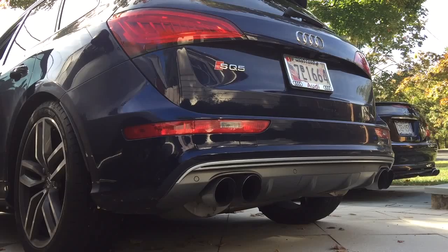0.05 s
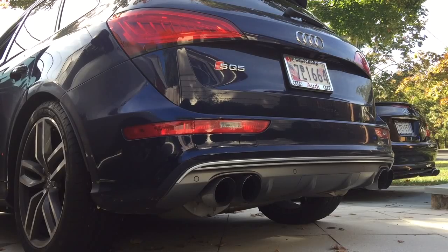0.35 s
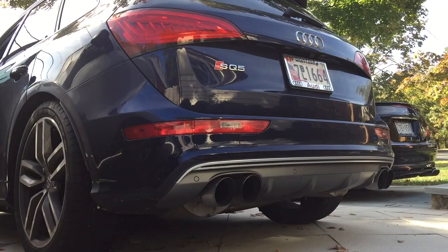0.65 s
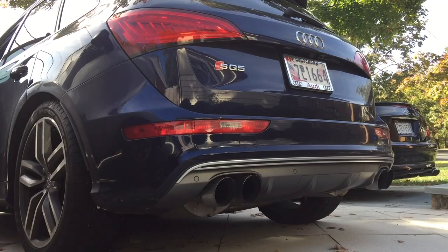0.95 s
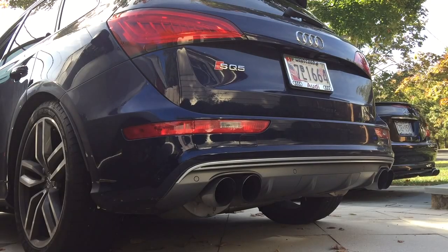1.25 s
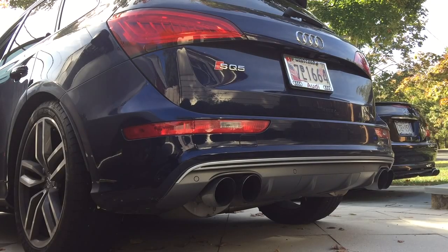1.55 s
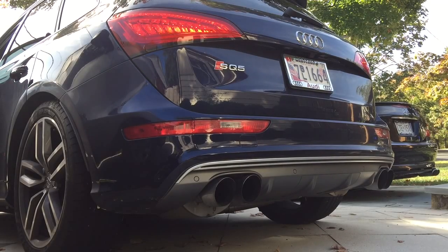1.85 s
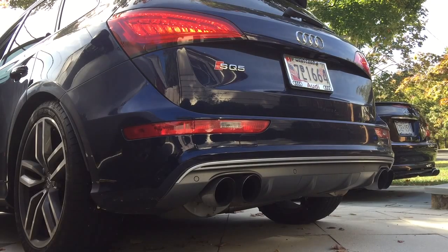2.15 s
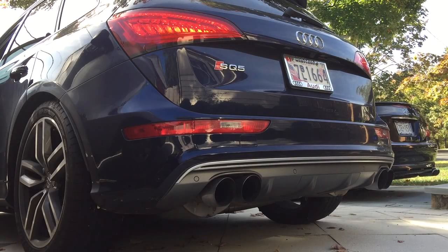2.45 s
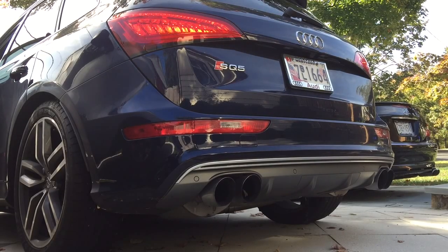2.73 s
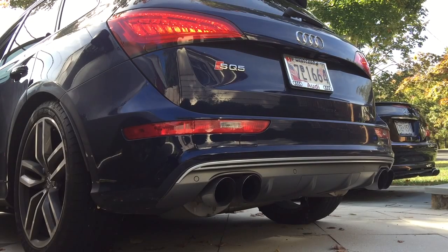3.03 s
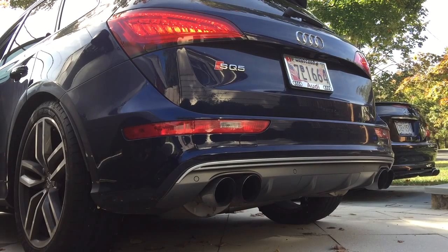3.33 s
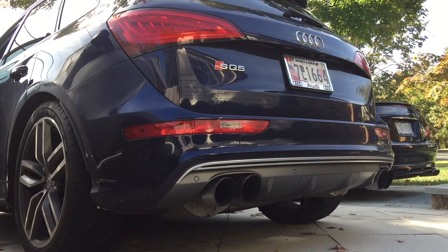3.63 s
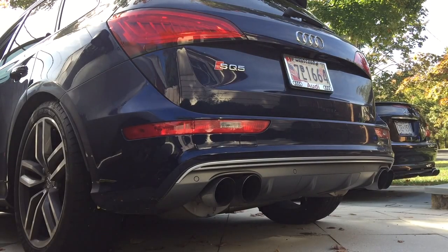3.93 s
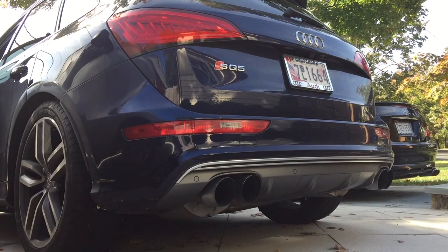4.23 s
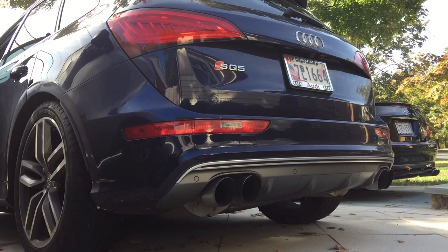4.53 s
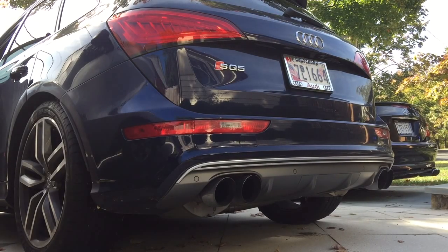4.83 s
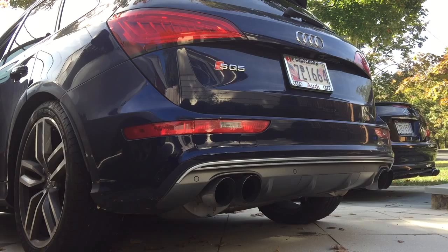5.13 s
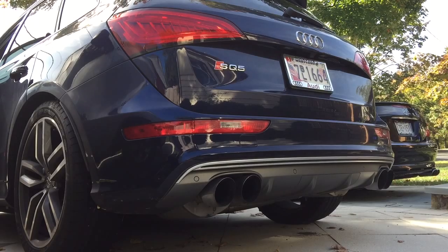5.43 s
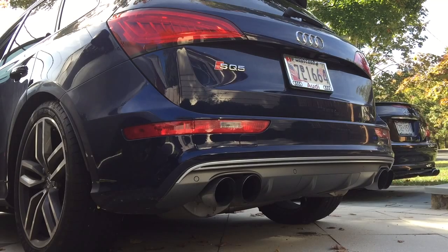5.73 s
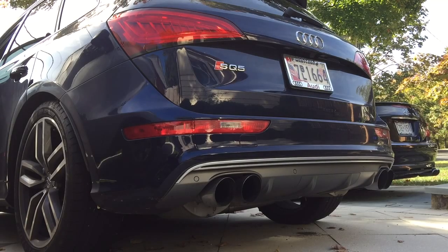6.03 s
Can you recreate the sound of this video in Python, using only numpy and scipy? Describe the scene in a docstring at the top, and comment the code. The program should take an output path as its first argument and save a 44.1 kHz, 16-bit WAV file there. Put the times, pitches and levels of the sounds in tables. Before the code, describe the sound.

A car starter clacks and cranks, then the engine catches, flares and settles into a loud, booming idle outdoors.

```python
"""Distant traffic, a soft whirr and a faint insect on a paved drive; the microphone is just behind the
tailpipes of a cold V6 car. The starter clacks in and grinds through eight compressions. The engine
catches with a few chuffs, flares, and settles to a loud, booming fast idle: each firing rings the
exhaust pipe, the lowest orders boom in its deep resonances, and the escaping gas rasps and fizzes.
Short echoes scatter between the paving and the floor of the car."""
import sys
import numpy as np
from scipy import signal
from scipy.fft import rfft, irfft
from scipy.io import wavfile
from scipy.ndimage import uniform_filter1d

SR = 44100
rng = np.random.default_rng(int(sys.argv[2]) if len(sys.argv) > 2 else 0)


def transcribe(u):
    """Save the signal u as a 16-bit wav file named by the first command-line argument.

    u: samples, shape (n,) or (channels, n), limited to [-1, 1]; the rate is SR.
    q: integer samples, one column per channel.
    """
    v = np.clip(np.atleast_2d(u).T, -1, 1)
    q = np.round(v * 32767).astype(np.int16)
    wavfile.write(sys.argv[1], SR, q)


N = 276948
T = np.arange(N) / SR
HZ = np.fft.rfftfreq(N, 1 / SR)


def exhaust(catch_s=2.72):
    """The running engine at the tailpipes: bark, drone and rushing gas follow its speed and load."""
    # engine speed: time_s, firing_rate_hz
    speed = [(2.72, 15.12), (2.8, 42.38), (2.97, 70.94), (3.2, 93.71), (3.3, 95.54), (3.4, 92.8),
             (3.6, 83.54), (3.7, 75.76), (3.95, 71.33), (4.2, 70.11), (4.55, 69.81), (4.78, 70.36),
             (4.95, 68.26), (5.28, 65.08), (5.55, 64.34), (5.98, 64.59), (6.28, 62.51)]
    firing_hz = curves(speed)[0] * (T >= catch_s)
    fired = np.cumsum(firing_hz) / SR  # running count of firings
    pulses, fronts = firings(fired)
    ragged = swell(2.815, .06)  # the first charges burn raggedly
    layers = bark(pulses, fronts, ragged) + drone(firing_hz, fired) + rush(pulses, ragged)
    return ramp(catch_s, .025) * layers


def firings(fired, idle_drop_s=4.9, jitter=.005):
    """Pulse bodies and fronts, one blow-down per firing: uneven while cold, loping as the idle drops."""
    # cylinders in firing order, before and after the drop: body_db, front_db, late_intervals
    fast_idle = [(-1.1, 1.2, .34), (-1.9, .4, .317), (2.2, -7.5, .338), (2.8, -5.5, .327),
                 (-2.3, -7.5, .33), (-2.8, -9, .361)]
    slow_idle = [(-1, 1.2, .276), (-.4, 2.7, .257), (4.6, -6, .287), (.8, -1.3, .275), (-3.1, -11, .324),
                 (-5.4, -12, .293)]
    # extra hard firings in the flare: time_s, boost_db
    bangs = [(2.9, 10), (2.948, 13), (3.092, 7.5), (3.104, 3.5), (3.425, 11.5), (3.539, 4.5), (3.575, 6),
             (3.742, 3)]
    k = np.arange(int(fired[-1]))
    cylinder = k % len(fast_idle)
    dropped = np.interp(k, fired, ramp(idle_drop_s, .12))[:, None]
    blend = (1 - dropped) * np.array(fast_idle)[cylinder] + dropped * np.array(slow_idle)[cylinder]
    body_db, front_db, late = blend.T
    timing, strength = rng.standard_normal((len(k), 2)).T
    fire_s = np.interp(k + late + jitter * timing, fired, T)
    extra_db = strength * np.interp(fire_s, [3.0, 3.8], [1.6, .6])  # less scatter as it warms
    for s, db in bangs:
        extra_db[np.argmin(abs(fire_s - s))] += db
    return [np.bincount((fire_s * SR).astype(int), amp(db + extra_db), N)[:N] for db in (body_db, front_db)]


def bark(pulses, fronts, ragged, crossover_hz=560):
    """Pulses and turbulence ring the pipe; steep fronts feed its upper resonances and crack under load."""
    upper = 1 / (1 + (crossover_hz / (HZ + 1)) ** 8)
    edge = amp(2.5 + 3 * ramp(2.9, .083))
    drive = irfft(rfft(pulses) * (1 - upper) + rfft(fronts * edge) * upper, N)
    turbulence = (.09 + .35 * ragged) * puffs(pulses, decay_s=.018, stream=.98) * noise()
    crack = steady(band(puffs(fronts, decay_s=.00066, stream=0) * noise(), 1300, 1650))
    ring = steady(pipe(steady(drive) + turbulence))
    return load_gain(-17, slope=.98) * ring + load_gain(-66, slope=2.4) * crack


def pipe(x, round_trip_s=.0054, direct=.91, size=8192):
    """The exhaust system rings at its resonances; the silencer swallows what lies above them."""
    # pipe and silencer resonances: pitch_hz, width_hz, gain_db
    modes = [(206.5, 14.3, -4), (275.4, 45.5, 4.5), (344.5, 8, -1), (378.9, 29.5, 5.5), (443.4, 28.4, -5.5),
             (498.4, 35.6, -9), (530, 53, -6), (628.7, 70, -8.5), (721.5, 32, -15.5), (814, 17, -24),
             (890, 59, -19.5), (985, 83, -33)]
    hz = np.fft.fftfreq(size, 1 / SR)
    gain = response(modes, abs(hz)) / (1 + (hz / 1100) ** 8) / (1 + (150 / (abs(hz) + 1)) ** 6) + 1e-5
    causal = np.exp(signal.hilbert(np.log(gain)).conj())  # minimum phase
    echo = np.exp(-2j * np.pi * hz * round_trip_s)
    bounces = (direct + echo) / (1 + direct * echo)  # these fill the gaps between firings
    ring = np.fft.ifft(causal * bounces).real
    return signal.oaconvolve(x, ring[:size // 2])[:N]


def drone(firing_hz, fired, waver=.028):
    """The three lowest multiples of the firing rate boom as they sweep through deep resonances."""
    # resonances of the whole exhaust: pitch_hz, width_hz, gain_db
    deep_modes = [(54, 5.8, -11), (82.9, 10.8, -17), (143.9, 21, -14)]
    waves = 0
    for k in (1, 2, 3):
        wave = np.cos(2 * np.pi * k * (fired - .45))
        waves += response(deep_modes, k * firing_hz) * wave * (1 + waver * drift(25))
    return np.sqrt(2) * load_gain(.1, slope=.64) * waves


def rush(pulses, ragged):
    """Gas leaves the tailpipes as low gusts, rasp and fizz, lifted by the catch and the open throttle."""
    # middle and top spectra of the gas jet: frequency_hz, level_db
    rasp_spectrum = [(680, -11), (1150, -3), (1250, 1), (1370, -4), (1500, -2), (1920, -6), (2070, -3),
                     (2390, -4.5), (3320, -10), (3590, -14), (4100, -5), (4830, -15), (5070, -23.5),
                     (5570, -13.5), (7500, -44.5), (9750, -58), (16500, -120)]
    fizz_spectrum = [(3820, -19), (6500, 0), (7450, -3), (9710, -2), (10500, -8), (13300, -4.5),
                     (17000, -12)]
    throttle = ramp(2.76, .04) * (1 - ramp(3.14, .05))
    gust = unit(band(noise(), 36, 174, order=4)) * (amp(-44) + amp(-22) * swell(2.8, .06))
    jet = noise() * amp(1.2 * drift(400))
    jet = jet + amp(-10) * ringing(jet, t60=.015)
    rasp = steady(colour(jet, rasp_spectrum) * puffs(pulses, decay_s=.0068, stream=1))
    spray = colour(jet * amp(1.1 * drift(900)), fizz_spectrum)
    fizz = steady(spray * puffs(pulses, decay_s=.0025, stream=2.7))
    rasp *= amp(3.85 * throttle + 6.6 * ragged + .6 * drift(12))
    fizz *= amp(9 * throttle + 9 * ragged + 7 * ramp(2.9, 2.4))  # more hiss as the pipes warm up
    return gust + load_gain(-44.5, slope=.4) * rasp + load_gain(-61, slope=.3) * fizz


def puffs(pulses, decay_s, stream):
    """Gas flow: a dying jet after each pulse, over a steady stream."""
    return steady(signal.lfilter([1], [1, -np.exp(-1 / (decay_s * SR))], pulses)) + stream


def load_gain(idle_db, slope):
    """Gain of an exhaust layer, rising by slope dB for each dB of engine load."""
    # how hard the engine works against idle: time_s, load_db
    load = [(2.74, -10), (2.83, -0.5), (2.9, 0), (2.96, 5), (3.02, 7.5), (3.06, -.5), (3.1, 5.5), (3.16, 8),
            (3.21, -0.5), (3.39, 0.8), (3.54, 6), (3.66, -5), (3.73, -6.5), (3.81, -1), (4.3, -2.5),
            (5.0, 1.3), (5.2, -2.5), (5.65, .3)]
    return amp(idle_db + slope * curves(load)[0])


def starter(puff_delay_s=.0045):
    """Gear rattle swells at every compression and rings the housing, along with a puff of pumped air."""
    # compressions: start_s, relative_gear_db, relative_puff_db
    strokes = [(2.005, -38, -32), (2.117, -36, -29.5), (2.218, -35.5, -34), (2.3, -35.5, -31),
               (2.385, -37.5, -33), (2.47, -36, -31), (2.56, -38.5, -32), (2.648, -36.5, -32.5)]
    # gear noise spectrum: frequency_hz, level_db
    gears = [(150, -16), (260, 4.5), (350, -3.5), (442, 2.5), (551, -6.5), (650, -3), (900, 0),
             (1160, -9.5), (1450, -7), (2520, -19.5), (4700, -22.5), (6590, -22), (13200, -39),
             (17000, -40)]
    # housing resonances against the gear noise: pitch_hz, width_hz, level_db
    housing = [(1680, 34, -38), (2130, 420, -10), (2520, 210, -9.5), (3240, 32, -19), (4140, 100, -32)]
    engaged = ramp(1.85, .0039) * (1 - ramp(2.74, .29))
    coast = amp(np.interp(T, [1.9, 2.08], [-42, -46]))
    strain = coast + amp(-5.5) * sum(amp(db) * compression(s) for s, db, _ in strokes)
    pump = sum(amp(db) * swell(s + puff_delay_s, .02) for s, _, db in strokes)
    grind = noise() * amp(1.4 * drift(500))
    grind = grind + amp(-5) * ringing(grind, t60=.08)
    ring = sum(amp(db) * unit(band(grind, hz - width / 2, hz + width / 2, order=1))
               for hz, width, db in housing)
    air = amp(-1.5) * steady(band(noise(), 39.7, 62, order=3), size=1500)
    air += amp(-5.5) * steady(band(noise(), 98, 155, order=4), size=1500)
    return engaged * (strain * (colour(grind, gears) + ring) + pump * air)


def compression(start_s, rise_s=.01, hold_s=.032, fall_s=.016):
    """The starter's strain against one compression: attack, hold, release."""
    return ramp(start_s, rise_s) * np.exp(-np.maximum(T - start_s - hold_s, 0) / fall_s)


def knocks(rise_s=.0049):
    """Solenoid, pinion, first chuffs and small ticks: noise bursts dying away around their own pitch."""
    # bursts: start_s, relative_level_db, decay_s, pitch_hz, width_octaves
    bursts = [(.408, -53, .012, 5000, 0.33), (0.486, -47, 0.013, 13000, 0.44),
              (.838, -54, .012, 14600, .06), (1.327, -56, 0.017, 3000, 0.37),
              (1.709, -50, 0.0062, 4500, 0.41), (1.828, -29, 0.046, 1710, 1.2),
              (1.856, -18.5, 0.012, 960, 1.1), (1.857, -25, 0.044, 303, 1.24),
              (1.895, -33.5, 0.011, 8000, 0.82), (2.788, -28, 0.0067, 6560, 0.15),
              (2.809, -25, 0.0076, 8650, 0.23), (2.832, -16, 0.0033, 7100, 0.67),
              (2.947, -14, 0.0068, 1030, 0.11), (2.947, -30.5, 0.017, 7950, 2),
              (5.485, -20, 0.0045, 2000, 0.96)]
    out, t = np.zeros(N), T[:SR // 4]
    hz = np.fft.rfftfreq(len(t), 1 / SR) + 1
    for start_s, db, decay_s, pitch_hz, octaves in bursts:
        spectrum = np.exp(-.5 * (np.log2(hz / pitch_hz) / octaves) ** 2)
        burst = unit(irfft(rfft(rng.standard_normal(len(t))) * spectrum, len(t)))
        envelope = (1 - np.exp(-t / rise_s)) * np.exp(-t / decay_s)
        part = out[int(start_s * SR):][:len(t)]
        part += (amp(db - 1) * burst * envelope)[:len(part)]
    return out


def underbody(x, wet_db=-15):
    """Adds scattered echoes between the paving and the floor of the car."""
    return x + amp(wet_db) * band(ringing(x, t60=.076), 200, 15000)


def ringing(x, t60):
    """Dense, quickly dying echoes of metal and hard surfaces."""
    t = T[:SR // 4]
    tail = rng.standard_normal(len(t)) * amp(-60 * t / t60) * (t > .004)
    return signal.oaconvolve(x, tail / np.linalg.norm(tail))[:N]


def traffic(level_db=-39.5):
    """Distant traffic: a low, wavering rumble."""
    # rumble spectrum: frequency_hz, level_db
    spectrum = [(15, -64), (25, -27), (48, -21), (59, -4), (82, 0), (153, -7.5), (185, -13.5), (405, -29.5),
                (531, -32.5), (734, -33), (1190, -34.5), (2760, -46), (5570, -53), (7310, -55.5),
                (16000, -60)]
    return amp(level_db) * colour(noise(), spectrum) * amp(1.3 * drift(22))


def whirr():
    """A soft whirr comes and goes before the start, with a brief low hum towards its end."""
    # loudness of the whirr: time_s, level_db
    levels = [(0, -48), (.2, -55.5), (.9, -61), (1.28, -90), (1.35, -57.5), (1.58, -49.5), (1.68, -71),
              (1.9, -123)]
    # its spectrum: frequency_hz, level_db
    spectrum = [(150, -28), (250, -2.5), (358, -13), (555, -8), (617, -15), (1080, -15.5), (1270, -16),
                (1650, -16.5), (2020, -25.5), (2400, -22.5), (6000, -39), (7800, -81), (13200, -120)]
    whirring = amp(curves(levels)[0]) * colour(noise(), spectrum) * amp(1.3 * drift(20))
    hum = amp(-57) * swell(1.61, .34, order=4) * unit(band(noise(), 250, 303))
    return whirring + hum


def insect(pitch_hz=5420, peak_db=-72.5, first_s=.057, period_s=.1027):
    """A faint insect pulses evenly in one narrow, high band."""
    chirps = np.maximum(np.cos(2 * np.pi * (T - first_s) / period_s), 0)
    return amp(peak_db) * unit(band(noise(), pitch_hz - 40, pitch_hz + 40)) * chirps


def amp(db):
    """Decibels to gain."""
    return 10 ** (np.asarray(db) / 20)


def unit(x):
    """Scales to rms 1."""
    return x / np.sqrt(np.mean(x ** 2) + 1e-20)


def steady(x, size=4000):
    """Holds the slow level of x at 1, keeping the beat within it."""
    power = uniform_filter1d(uniform_filter1d(x ** 2, size), size)
    return x / np.sqrt(abs(power) + .01 * np.mean(x ** 2))


def curves(rows):
    """Each column after the first, joined by straight lines in time."""
    times, *columns = np.transpose(rows)
    return [np.interp(T, times, column) for column in columns]


def ramp(start_s, length_s):
    """Rises from 0 to 1."""
    return np.clip((T - start_s) / length_s, 0, 1)


def swell(centre_s, half_width_s, order=2):
    """A smooth hump around a moment; a higher order flattens its top."""
    return np.exp(-abs((T - centre_s) / half_width_s) ** order)


def noise():
    """White noise."""
    return rng.standard_normal(N)


def drift(hz):
    """Random wander up to about the given rate, at rms 1."""
    return unit(irfft(rfft(noise()) * np.exp(-(HZ / hz) ** 2), N))


def colour(x, points):
    """Gives x a spectrum, at rms 1."""
    hz, db = np.transpose(points)
    gain = amp(np.interp(np.log(HZ + 1), np.log(hz + 1), db))
    return unit(irfft(rfft(x) * gain, N))


def band(x, low_hz, high_hz, order=2):
    """Causal band-pass."""
    return signal.sosfilt(signal.butter(order, [low_hz, high_hz], "band", fs=SR, output="sos"), x)


def response(modes, hz):
    """Gain of a set of resonances at the given frequencies."""
    return sum(amp(db) / (1 + (2 * (hz - centre) / width) ** 2) for centre, width, db in modes)


def scene():
    """One microphone close behind the car, with the outdoor background beyond."""
    car = underbody(exhaust() + starter() + knocks())
    return (car + traffic() + whirr() + insect())[None]


def record(dry, cutoff_hz=17100):
    """The recorder opens, rounds off the highest peaks and limits the band."""
    x = dry * ramp(.036, .0021)
    x = x / (1 + x ** 8) ** (1 / 8)
    lowpass = signal.firwin(511, cutoff_hz, window=("kaiser", 9), fs=SR)
    return signal.oaconvolve(x, lowpass[None], "same")


dry = scene()
out = record(dry)
transcribe(out)
```